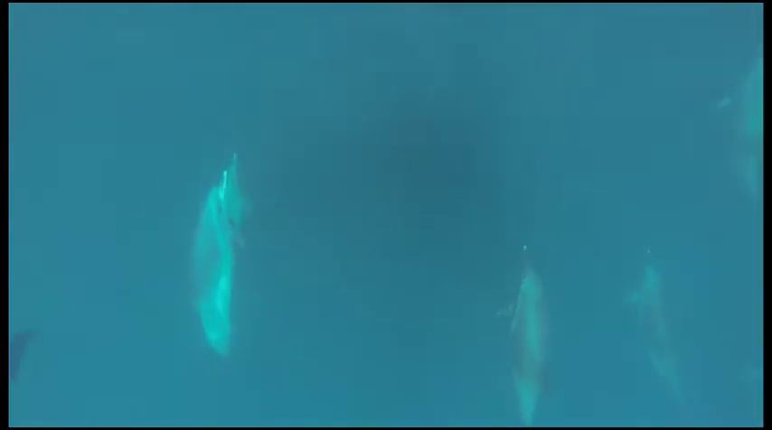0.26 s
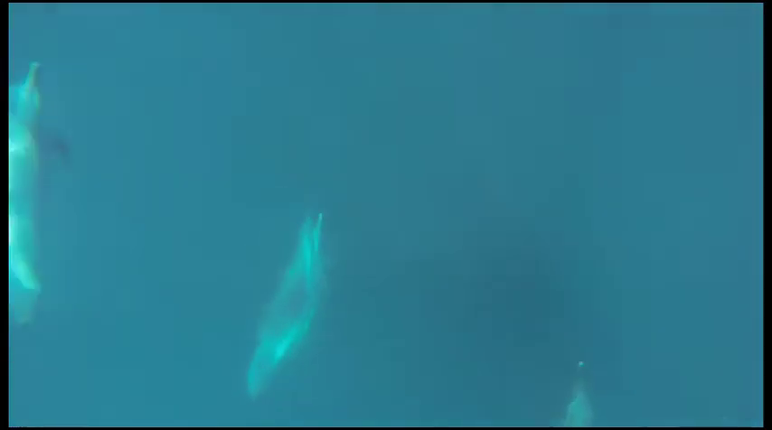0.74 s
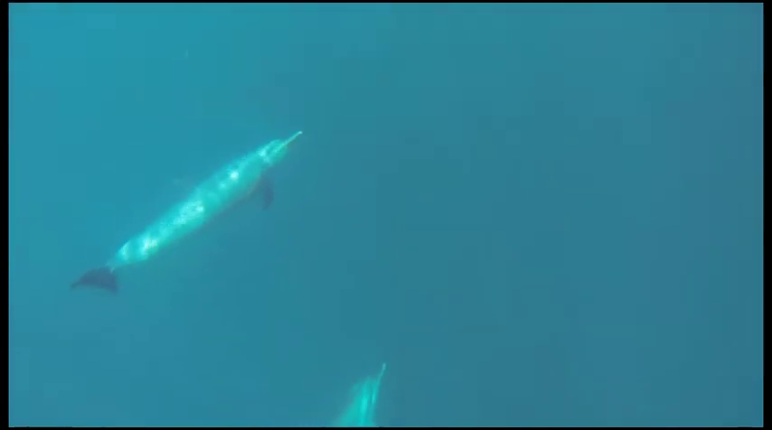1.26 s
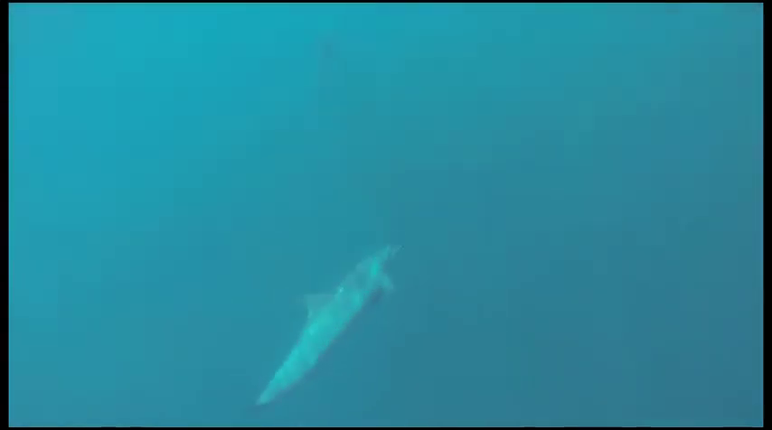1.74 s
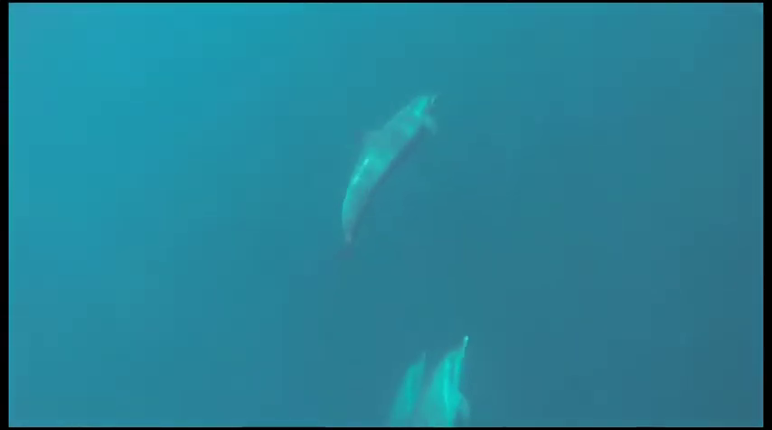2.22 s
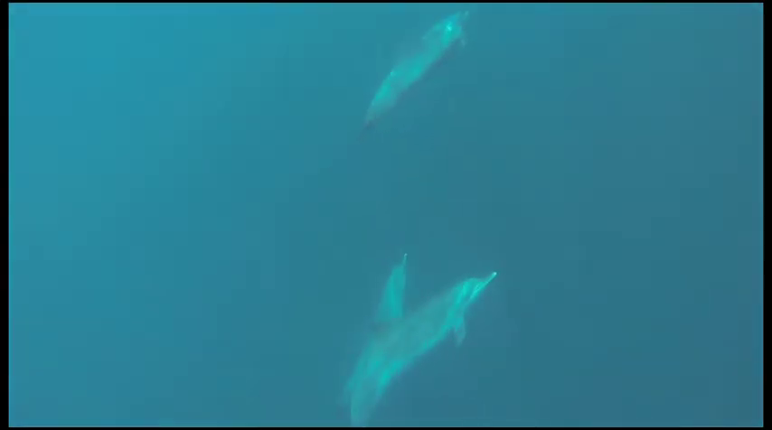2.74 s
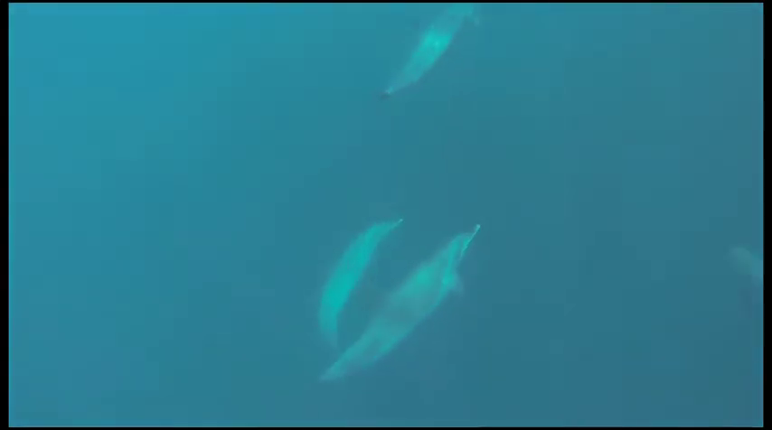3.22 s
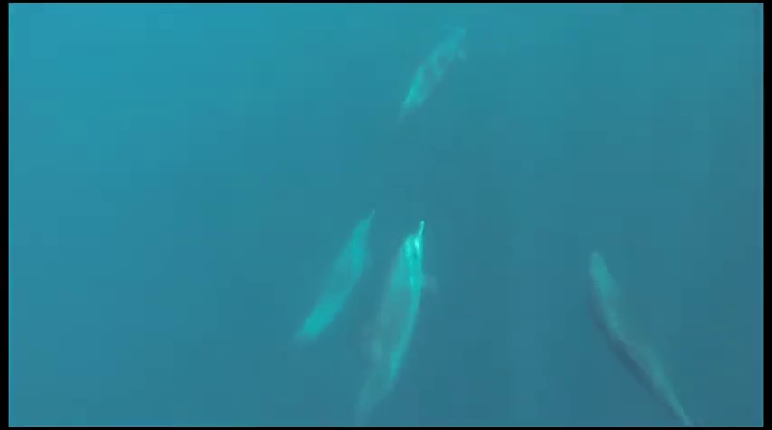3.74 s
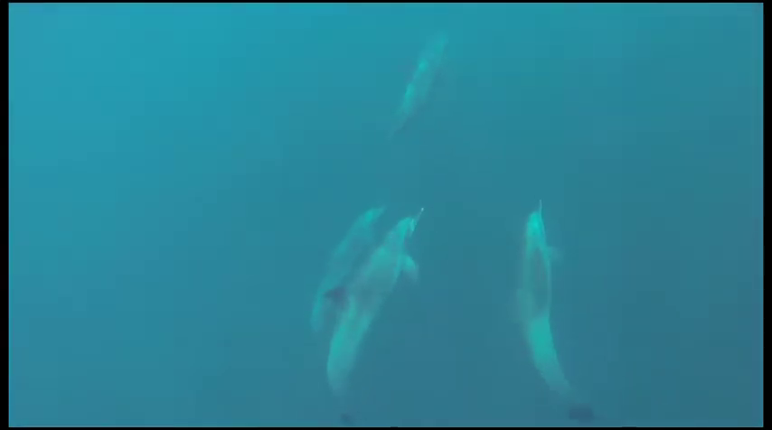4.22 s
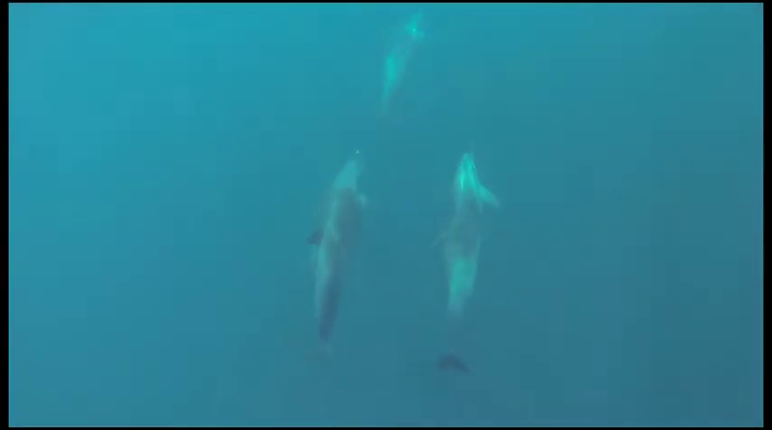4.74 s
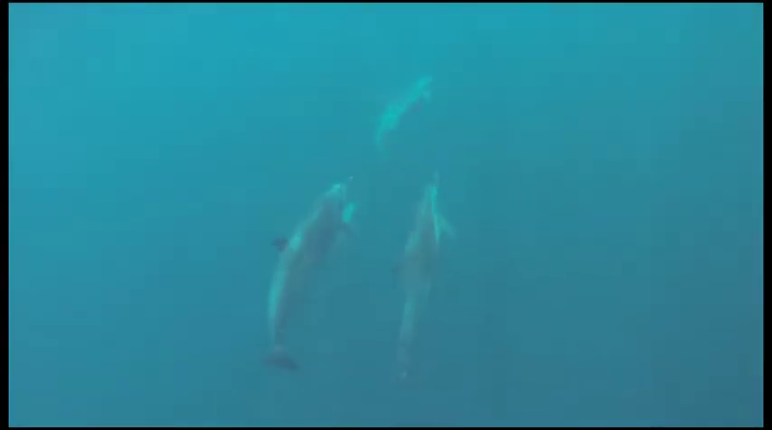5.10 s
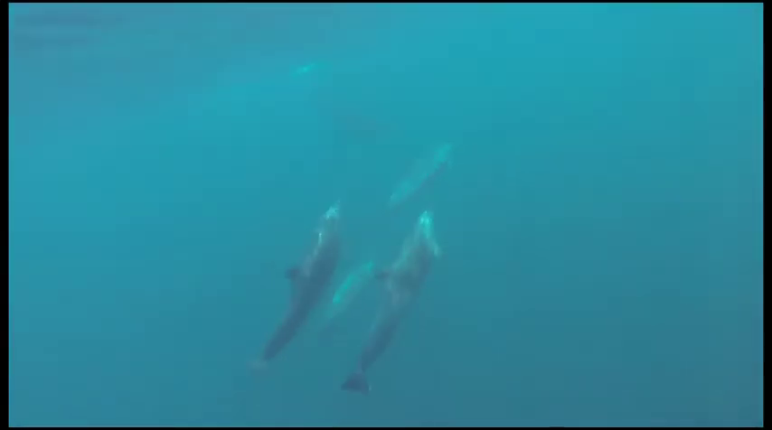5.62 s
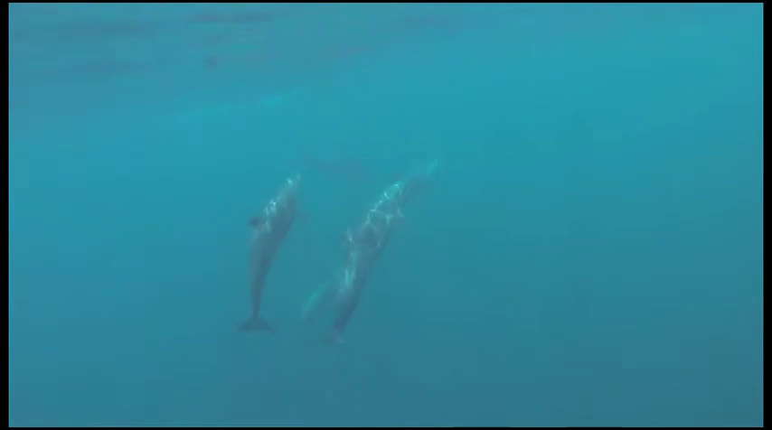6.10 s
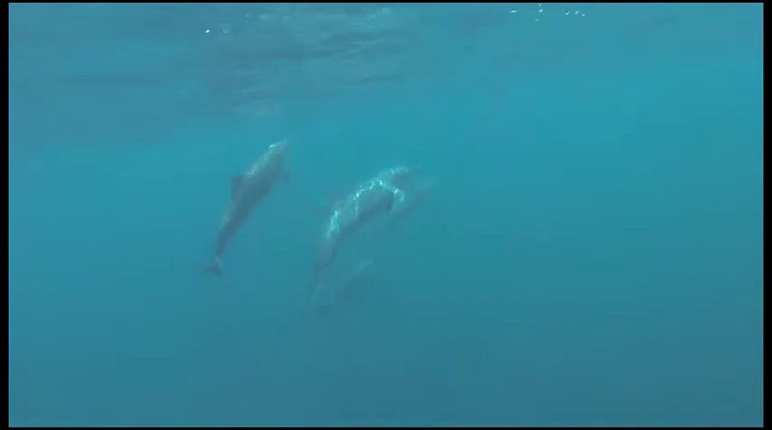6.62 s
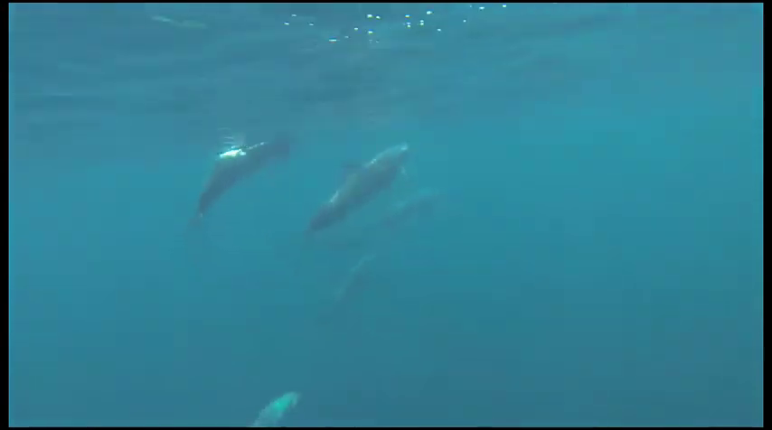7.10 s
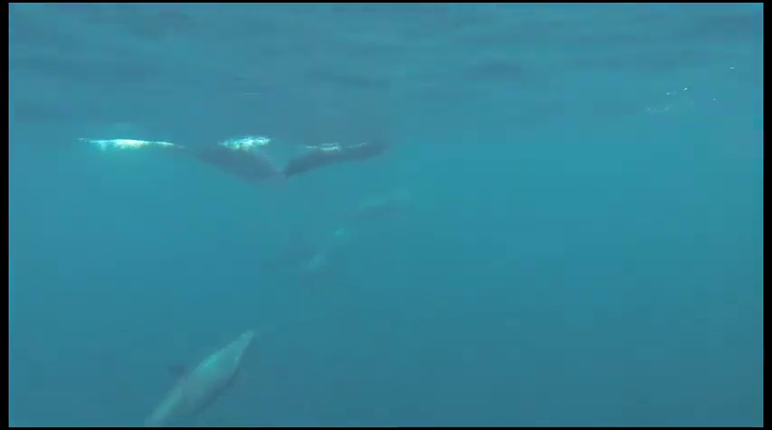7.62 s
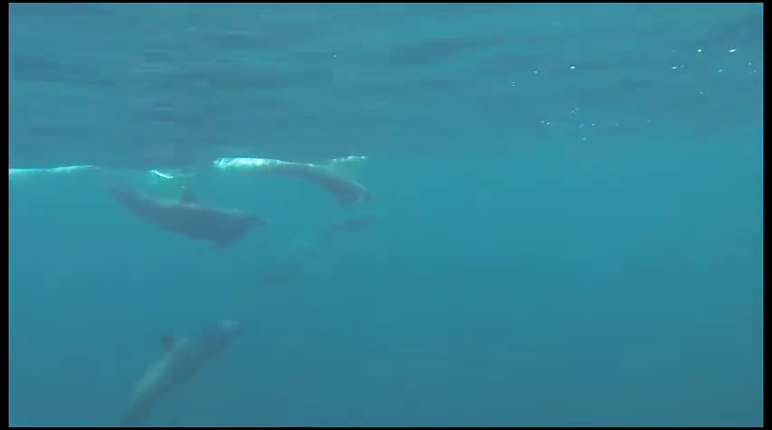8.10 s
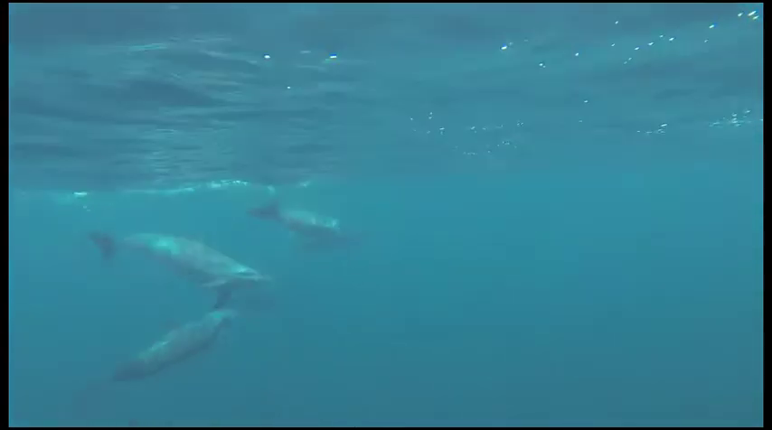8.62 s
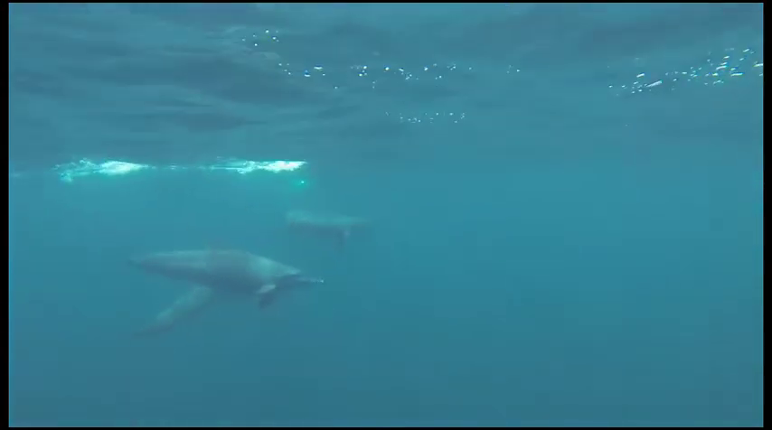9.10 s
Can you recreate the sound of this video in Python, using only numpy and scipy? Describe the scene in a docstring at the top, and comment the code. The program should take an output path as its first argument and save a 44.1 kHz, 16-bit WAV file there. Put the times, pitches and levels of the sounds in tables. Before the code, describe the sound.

Underwater, dolphins whistle in thin, fast upward sweeps and stair steps over a throbbing, crackling hiss, with clicks, bubble pings and small surface splashes.

```python
"""Dolphins passing under water

Dolphin whistles (sine tones) sweep upward, some in sudden steps; sonar clicks pass in trains of filtered impulses,
with dull knocks and noise-burst snaps. Behind throbs a crackling hiss, likely a boat's cavitating propellers:
sparse impulses and noise, modulated by three beats. Bubbles ping and gulp as decaying sines; surfacing backs splash.
Filtered noise slops against the camera housing, whose resonances colour the noise and clicks."""
import sys
import numpy as np
from scipy import signal
from scipy.fft import rfft, irfft
from scipy.io import wavfile
from scipy.ndimage import uniform_filter1d

SR = 44100
rng = np.random.default_rng(int(sys.argv[2]) if len(sys.argv) > 2 else 0)


def file_out(sig):
    """Save sig as 16-bit WAV at sys.argv[1]."""
    # one column per channel
    cols = np.atleast_2d(sig).T
    # limit, then scale
    lim = np.clip(cols, -1, 1)
    pcm = np.round(lim * 32767).astype(np.int16)
    wavfile.write(sys.argv[1], SR, pcm)


N = 412335
T = np.arange(N) / SR

# Table levels are relative: gains and filters follow.
# churn of the water, drives slosh and fizz, dulls the hiss: time_s, level_db
CHURN_CURVE = [(0.0, -57), (0.26, -58.5), (1.2, -49), (1.48, -53), (3.25, -54), (4.17, -63), (6.74, -67),
               (6.9, -57.5), (8.02, -61.5), (8.28, -52), (8.98, -63.5), (9.35, -54.5)]


def whistles(sweep_db=1.2, note_db=0):
    """Gliding and stepped whistles share a faint echo from the surface."""
    # unbroken whistles, one list each: time_s, pitch_hz, level_db
    sweep_points = [
        [(.128, 4100, -60), (.15, 4250, -53), (.192, 4700, -57), (.198, 4780, -43), (.235, 5250, -51),
         (.248, 5550, -42), (.285, 6450, -52)],
        [(1.935, 6050, -49), (2.0, 6400, -45), (2.06, 7800, -46), (2.075, 8400, -45), (2.155, 9050, -47),
         (2.165, 9450, -38), (2.25, 10500, -49), (2.42, 13900, -49), (2.45, 15200, -57)],
        [(2.98, 7150, -54), (3.1, 8700, -55), (3.13, 9900, -48), (3.21, 11200, -47), (3.325, 14700, -57)],
        [(3.19, 6450, -52), (3.272, 8780, -44), (3.277, 9000, -34), (3.33, 9280, -28), (3.349, 9390, -33),
         (3.351, 10380, -29), (3.378, 10620, -26), (3.412, 10650, -29), (3.45, 10600, -25), (3.499, 10590, -39),
         (3.502, 11980, -32), (3.577, 12120, -34), (3.58, 12830, -32), (3.607, 13160, -32), (3.625, 13520, -45),
         (3.65, 14050, -44), (3.665, 15000, -56)],
        [(3.555, 8750, -52), (3.66, 10150, -52), (3.75, 11900, -52), (3.91, 15200, -57)],
        [(3.9, 6250, -44), (3.94, 6550, -45), (4.0, 7400, -49), (4.06, 8750, -38), (4.1, 9350, -47),
         (4.21, 11300, -53), (4.34, 15200, -62)],
        [(4.91, 8850, -57), (5.04, 9400, -52), (5.18, 10250, -56), (5.26, 11000, -53), (5.4, 11800, -54),
         (5.58, 14900, -60)],
        [(6.39, 6700, -53), (6.5, 8400, -46), (6.56, 9150, -36), (6.62, 9950, -45), (6.67, 10800, -38),
         (6.73, 11650, -51), (6.76, 12450, -40), (6.805, 14750, -51), (6.84, 15400, -49)],
        [(8.68, 6550, -54), (8.72, 7300, -44), (8.76, 7750, -38), (8.84, 8550, -45), (8.88, 8980, -34),
         (8.92, 9400, -35), (8.96, 9930, -42), (8.995, 10450, -37), (9.04, 11350, -49), (9.08, 12750, -45),
         (9.165, 15400, -57)],
        [(8.765, 7450, -44), (8.82, 8190, -43), (8.855, 8750, -46), (8.905, 9730, -38), (8.96, 10330, -44),
         (9.0, 10760, -39), (9.03, 11250, -47)],
    ]
    # separate rising notes: start_s, length_s, pitch_hz, climb_hz, level_db
    stair_notes = [(.305, .027, 7170, 0, -42), (.37, .055, 8800, 250, -44), (.425, .051, 10110, 0, -44),
                   (.476, .098, 10660, 230, -43), (.574, .06, 12700, 440, -47),
                   (.634, .106, 13760, 400, -53), (7.767, .021, 4650, 750, -43),
                   (7.795, .075, 5550, 1050, -44), (7.87, .067, 6900, 950, -46),
                   (7.937, .1, 8250, 1000, -40), (8.038, .088, 9750, 1300, -42),
                   (8.126, .064, 11650, 800, -40), (8.19, .035, 13150, 800, -33),
                   (8.225, .027, 14200, 1050, -43)]
    out = np.zeros(N)
    for points in sweep_points:
        s, sound = sweep(points)
        add(out, s, amp(sweep_db) * sound)
    for s, *row in stair_notes:
        add(out, s, amp(note_db) * note(*row))
    return scatter(out, wet_db=-15, t60_s=0.043)


def sweep(points):
    """One whistle climbs without a break: (start_s, sound)."""
    s, hz, db = np.transpose(points)
    t = np.arange(s[0], s[-1], 1 / SR)
    return s[0], tone(np.interp(t, s, hz), np.interp(t, s, db), edge_s=0.0076)


def note(length_s, pitch_hz, climb_hz, db, scoop_hz=200, scoop_s=0.0102, fade_db=9, edge_s=0.00089):
    """One stair of a stepped whistle: scoops up to pitch, creeps higher and weakens before its end."""
    t = np.arange(0, length_s + edge_s, 1 / SR)
    hz = pitch_hz + climb_hz * t / length_s - scoop_hz * np.exp(-t / scoop_s)
    return tone(hz, db - fade_db * (t / length_s) ** 5, edge_s)


def tone(hz, db, edge_s, waver_hz=15, waver_s=.006, steady_db=-30, flutter_per_db=.24):
    """Sine with an octave overtone at low pitch; the fainter it arrives, the more it wavers and breaks up."""
    # octave overtone relative to the fundamental: pitch_hz, level_db
    overtone_curve = [(4200, 10), (4700, -2), (6300, -7), (7500, -15), (8000, -70)]
    t = np.arange(len(hz)) / SR
    ends = np.clip(np.minimum(t, t[-1] - t) / edge_s, 0, 1)
    chances = rng.standard_normal((2, 200))
    waver, fading = (np.interp(t, np.arange(len(c)) * waver_s, c) for c in chances)
    flutter_db = flutter_per_db * np.maximum(steady_db - db, 0)
    # waver_hz applies at steady_db and above
    wavering_hz = hz + waver_hz * (1 + flutter_db) * waver
    phase = 2 * np.pi * np.cumsum(wavering_hz) / SR
    overtone = amp(np.interp(hz, *np.transpose(overtone_curve))) * np.sin(2 * phase)
    level = np.sqrt(2) * amp(db + flutter_db * fading)
    return level * ends * (np.sin(phase) + overtone)


def clicks(snap_db=10.0, sonar_db=0.0, snap_s=0.00065, far_db=-24, far_spread_db=9, count=70):
    """Snaps are brief noise bursts, a few near and many far; sonar clicks are single, brighter impulses."""
    # near snaps: start_s, level_db
    near = [(0.7017, -19), (.826, -20.5), (1.9193, -20.5), (2.8503, -22), (2.951, -20), (2.978, -22),
            (3.0304, -23), (4.63, -24), (4.8404, -23), (5.161, -22), (5.3485, -25), (5.814, -23),
            (6.168, -23), (6.209, -26), (6.323, -20.5), (6.783, -22), (6.9945, -24), (7.2674, -23),
            (7.899, -24)]
    # echolocation trains: first_s, last_s, fastest_s, shortest_gap_s, level_db
    trains = [(.025, .6, .21, 0.025, -29), (8.127, 8.57, 8.33, .0268, -19)]
    # spectra ahead of the housing: freq_hz, level_db
    snap_spectrum = [(300, -22), (1500, -11), (4000, 6.5), (7000, -1.5), (11000, -7.5), (15500, -28)]
    sonar_spectrum = [(500, -26), (2000, 7), (7000, -12), (11000, -1), (14500, 5), (16000, -19)]
    snaps, sonar = np.zeros(N), np.zeros(N)
    t = np.arange(SR // 100) / SR
    far = [(when * N / SR, far_db - far_spread_db * distance) for when, distance in rng.random((count, 2))]
    for s, db in near + far:
        burst = rng.standard_normal(len(t)) * np.exp(-t / snap_s)
        add(snaps, s, amp(db + snap_db) * burst / np.linalg.norm(burst))
    for train in trains:
        for s, db in sonar_train(*train):
            add(sonar, s, amp([db + sonar_db]))
    dry_clicks = colour(snaps, snap_spectrum) + colour(sonar, sonar_spectrum)
    return scatter(dry_clicks, wet_db=-6, t60_s=0.057)


def sonar_train(first_s, last_s, fastest_s, gap_s, db, slowing=.15, fall_db=9, fall_s=0.3, uneven_db=3.0):
    """Clicks quicken and grow as a dolphin's beam swings past, then slow and fade: rows of time_s, level_db."""
    rows, s = [], first_s
    for chance in rng.standard_normal(60):
        if s <= last_s:
            fall = min(((s - fastest_s) / fall_s) ** 2, 1)
            rows.append((s, db - fall_db * fall + uneven_db * chance))
            s += gap_s + slowing * (s - fastest_s) ** 2
    return rows


def knocks(level_db=-28.5, pitch_hz=4050, t60_s=.0035, uneven_db=1.5, pitch_spread=.06):
    """Departing dolphin, outside its sonar beam: only the low, briefly ringing part of each click is left."""
    # first_s, last_s, gap_s
    knock_times = (8.6505, 9.31, .034)
    out, times = np.zeros(N), np.arange(*knock_times)
    for s, (strength, detune) in zip(times, rng.standard_normal((len(times), 2))):
        knock = bubble(pitch_hz * (1 + pitch_spread * detune), t60_s, rise=0, onset=0.078)
        add(out, s, amp(level_db + uneven_db * strength) * knock)
    return scatter(out, wet_db=-9, t60_s=0.033)


def propellers(level_db=4.0, cavities_per_s=3500, cavity_spread_db=3.5, smooth_db=-3, uneven_db=3.0,
               patchy_db=2.0, most_db=8, burst_hz=2300, treble_hz=7500):
    """Collapsing cavities crackle in bursts at every beat of the blades."""
    # blade beats: first_crest_s, beat_hz
    beats = [(.0166, 39.18), (.0099, 17.255), (.003, 25.97)]
    # one depth_db per beat, before the tanh limit
    beat_depths_db = [3, 2, 1.33]
    # hiss level: time_s, level_db
    thrust_curve = [(0.0, -45.5), (2.68, -45), (3.07, -43), (3.93, -49.5), (5.26, -46.5), (5.86, -46),
                    (6.33, -45), (7.52, -47.5), (8.49, -47), (8.8, -51), (9.35, -45.5)]
    # spectrum ahead of the housing: freq_hz, level_db
    hiss_spectrum = [(100, -38.5), (400, -13), (750, -17.5), (1200, -7), (1900, 2), (2800, -3.5),
                     (3700, 4.5), (5000, -0.5), (6500, -9.5), (7300, -5), (10000, -7.5), (11700, -14.5),
                     (14500, -22.5), (15500, -27)]
    throb_db = uneven_db * drift(200)
    for (s, hz), depth_db in zip(beats, beat_depths_db):
        throb_db = throb_db + depth_db * np.cos(2 * np.pi * hz * (T - s))
    throb_db = most_db * np.tanh(throb_db / most_db)
    smooth = amp(smooth_db) * rng.standard_normal(N)
    cavities = evened(crackle(cavities_per_s, cavity_spread_db) + smooth)
    steady_hiss = colour(cavities * amp(follow(thrust_curve)), hiss_spectrum)
    hz, t, z = signal.stft(steady_hiss, SR, nperseg=128)
    hz = hz[:, None] + 1
    # bursts stand out in the upper hiss; its low part stays steadier
    z = z * amp(np.interp(t, T, throb_db) / (1 + (burst_hz / hz) ** 2))
    z = z * amp(np.interp(t, T, treble_db())) ** (1 / (1 + (treble_hz / hz) ** 6))
    # random colour patches: a few ms long, a kHz or two wide
    patches = uniform_filter1d(rng.standard_normal(z.shape), size=7, axis=0)
    patches = uniform_filter1d(patches, size=4, axis=1)
    hiss = signal.istft(z * amp(patchy_db * evened(patches)), SR)[1][:N]
    return amp(level_db) * surface_echo(hiss)


def treble_db(absorb=0.21, usual_db=0.9, turn_db=1.6, turn_s=5.7, turning_s=0.58):
    """Churned water soaks up the top of the hiss, which brightens when the camera turns up to the surface."""
    return usual_db - absorb * churn_db() + turn_db * np.tanh((T - turn_s) / turning_s)


def surface_echo(x, delay_s=.0033, sway_s=0.00019, strength=0.26):
    """The moving surface mirrors the sound with inverted sign, combing its spectrum."""
    return x - strength * np.interp(T - delay_s - sway_s * drift(0.3), T, x, left=0)


def near_bubbles(ping_db=-1, gulp_db=0, cycles=55, gulp_cycles=27):
    """Single bubbles ping close under the echoing surface; larger air pockets gulp with a rising pitch."""
    # near bubbles: start_s, level_db, pitch_hz
    ping_rows = [(1.329, -16.5, 3400), (1.758, -25, 3330), (1.791, -22, 3110), (1.948, -26, 1920),
                 (2.347, -28.5, 1930), (2.625, -40, 930), (2.668, -36, 1510), (2.827, -27, 3230),
                 (3.65, -36.5, 1400), (7.06, -28, 3420), (7.075, -18.5, 3250), (7.104, -30, 1820),
                 (7.131, -27, 2400), (7.1307, -28, 3240), (7.252, -23.5, 2230), (7.441, -35.5, 1530),
                 (7.8678, -27, 2450), (8.154, -26, 1990), (8.236, -20, 3390), (8.372, -26, 2300),
                 (9.2174, -28, 3080)]
    # gulps at the housing: start_s, level_db, pitch_hz
    gulp_rows = [(0.031, -38, 415), (.435, -32, 540), (0.451, -36, 630), (1.002, -30, 540),
                 (1.246, -36.5, 480), (1.767, -44, 840), (1.865, -44, 850), (2.08, -36, 865),
                 (2.083, -34, 540), (4.468, -44, 490), (4.691, -48, 425), (4.859, -43.5, 480),
                 (5.457, -44, 550), (6.324, -41.5, 525), (6.71, -49, 400), (6.765, -44, 520),
                 (6.83, -50, 360), (6.942, -43, 510), (7.15, -45, 638), (7.314, -43, 562),
                 (7.97, -41.5, 530), (8.904, -31, 535)]
    pings, gulps = np.zeros(N), np.zeros(N)
    for s, db, hz in ping_rows:
        add(pings, s, amp(db + ping_db) * bubble(hz, cycles / hz, rise=0.022, onset=0.019))
    for s, db, hz in gulp_rows:
        add(gulps, s, amp(db + gulp_db) * bubble(hz, gulp_cycles / hz, rise=0.09, onset=0.12))
    return scatter(pings, wet_db=-10.5, t60_s=0.072) + gulps


def splashes(bubbles_per_s=70, ping_db=-34, low_hz=1800, high_hz=3600, spread_db=10, t60_s=0.018,
             gurgles_per_s=100, gurgle_db=-7.5, gurgle_hz=300):
    """A back breaks the surface and drags down air, which breaks up into rising gurgles and pinging bubbles."""
    # surfacing dolphins: start_s, length_s, wash_db
    splash_rows = [(6.71, .19, -47), (7.054, 0.094, -50), (7.243, .1, -51), (7.34, .7, -59),
                   (8.12, .23, -40.5), (8.308, .14, -43.5)]
    # wash spectrum ahead of the housing: freq_hz, level_db
    wash_spectrum = [(90, -26), (200, -6.5), (400, -4), (600, -19), (1000, -4.5), (2200, 6), (5000, -0.5),
                     (14000, -28)]
    swell, pings = np.zeros(N), np.zeros(N)
    for s, length_s, wash_db in splash_rows:
        add(swell, s, amp(wash_db) * signal.windows.tukey(int(length_s * SR), .5))
        for when, size, distance in rng.random((int(length_s * bubbles_per_s), 3)):
            ping = bubble(low_hz * (high_hz / low_hz) ** size, t60_s, rise=0.016, onset=0.067)
            add(pings, s + when * length_s, amp(ping_db - spread_db * distance) * ping)
        for when, size, distance in rng.random((int(length_s * gurgles_per_s), 3)):
            gurgle = bubble(gurgle_hz * 2 ** size, t60_s=0.06, rise=0.16, onset=0.092)
            add(pings, s + when * length_s, amp(wash_db + gurgle_db - spread_db * distance) * gurgle)
    return pings + colour(swell * crackle(per_s=1300, spread_db=3), wash_spectrum)


def bump():
    """Something nudges the housing, which rings for a few cycles."""
    # start_s, level_db, pitch_hz, t60_s
    bump_row = (7.274, -34, 644, 0.012)
    out, (s, db, hz, t60_s) = np.zeros(N), bump_row
    add(out, s, amp(db) * bubble(hz, t60_s, rise=0, onset=0.12))
    return out


def fizz(level_db=-50, stir=0.65, spread_db=2.0, cycles=36, count=4000):
    """Many small bubbles ring under the surface, each size at its own pitch."""
    # bubble strength by pitch: pitch_hz, level_db
    fizz_curve = [(800, -13.5), (1250, -13), (1850, 0.5), (2400, -1), (2850, 3), (3250, 9), (4200, -20),
                  (6500, -12)]
    out = np.zeros(N)
    pitches_hz, strengths_db = np.transpose(fizz_curve)
    for when, size, chance in rng.random((count, 3)):
        hz = pitches_hz[0] * (pitches_hz[-1] / pitches_hz[0]) ** size
        db = np.interp(hz, pitches_hz, strengths_db) + spread_db * min(-np.log(chance), 4)
        add(out, when * N / SR, amp(db) * bubble(hz, cycles / hz, rise=0.014, onset=0.075))
    return amp(level_db + stir * churn_db()) * evened(out)


def slosh(level_db=1.3, lumpy_db=3.0, rumble_db=-76):
    """Water laps unevenly on the housing over a faint rumble: filtered noise."""
    # spectra ahead of the housing: freq_hz, level_db
    lap_spectrum = [(100, -29), (280, -10), (420, -2), (600, 2), (750, -5.5), (1100, -8.5), (2500, -29)]
    rumble_spectrum = [(20, -17), (50, -7), (88, 1.5), (115, -2.5), (200, -8), (2000, -46)]
    laps = evened(rng.standard_normal(N) * amp(lumpy_db * drift(24.0)))
    lapping = colour(laps * amp(follow(CHURN_CURVE)), lap_spectrum)
    rumble = colour(rng.standard_normal(N), rumble_spectrum)
    return amp(level_db) * lapping + amp(rumble_db) * rumble


def churn_db(usual_db=-58.5):
    """How far the water is churned above its usual state."""
    return follow(CHURN_CURVE) - usual_db


def bubble(hz, t60_s, rise, onset):
    """A bubble swells into ringing and dies away, its pitch creeping up by 2 * rise over t60_s."""
    t = np.arange(0, t60_s, 1 / SR)
    ring = amp(-60 * t / t60_s) * (1 - np.exp(-t / (onset * t60_s)))
    return ring / ring.max() * np.sin(2 * np.pi * hz * t * (1 + rise * t / t60_s))


def crackle(per_s, spread_db):
    """Sparse impulses of random sign and size, rms 1."""
    size = amp(spread_db * np.minimum(rng.exponential(1, N), 4)) * rng.choice([-1, 1], N)
    return evened(size * (rng.random(N) < per_s / SR))


def scatter(x, wet_db, t60_s):
    """The rippled surface sends back a short spray of echoes."""
    t = np.arange(0, t60_s, 1 / SR)
    sparse = rng.random(len(t)) < .05
    taps = rng.standard_normal(len(t)) * sparse * amp(-60 * t / t60_s)
    return x + amp(wet_db) * signal.oaconvolve(x, taps / np.linalg.norm(taps))[:N]


def colour(x, spectrum, size=4096):
    """Minimum-phase filter of unit energy: a source spectrum lifted by the housing resonances."""
    # housing resonances: centre_hz, width_hz, lift_db
    housing = [(555.5, 193, 10.5), (925, 196, 5.5), (1830, 520, 3), (2440, 480, 7.5), (3176, 475, 10),
               (4207, 410, 4), (5478, 610, 8), (6295, 780, 9), (8980, 1360, 4), (10880, 790, 10.5),
               (12620, 580, 7), (13260, 800, 9)]
    hz = np.fft.rfftfreq(size, 1 / SR)
    f, db = np.transpose(spectrum)
    db = np.interp(np.log(hz + 1), np.log(f), db)
    db = db + sum(lift / (1 + (2 * (hz - centre) / width) ** 4) for centre, width, lift in housing)
    log_gain = np.log(amp(np.r_[db, db[-2:0:-1]]))
    # the Hilbert transform of log gain gives the minimum phase
    ring = np.fft.ifft(np.exp(signal.hilbert(log_gain).conj())).real[:size // 2]
    return signal.oaconvolve(x, ring / np.linalg.norm(ring))[:len(x)]


def drift(rate_hz):
    """Slow random motion of rms 1, rolling off around rate_hz."""
    rolloff = np.exp(-(np.fft.rfftfreq(N, 1 / SR) / rate_hz) ** 2)
    return evened(irfft(rfft(rng.standard_normal(N)) * rolloff, N))


def follow(curve):
    """A curve of (time_s, value) rows at every sample."""
    return np.interp(T, *np.transpose(curve))


def amp(db):
    """Decibels to gain."""
    return 10 ** (np.asarray(db) / 20)


def evened(x):
    """Scales to rms 1."""
    return x / np.sqrt(np.mean(x ** 2) + 1e-20)


def add(mix, s, sound):
    """Mixes a sound in at time s, in seconds."""
    part = mix[max(round(s * SR), 0):][:len(sound)]
    part += sound[:len(part)]


def scene():
    """All sources meet at one microphone."""
    dolphins = whistles() + clicks() + knocks()
    water = near_bubbles() + splashes() + bump() + fizz() + slosh()
    return (dolphins + propellers() + water)[None]


def record(dry):
    """The camera's band limit: a linear-phase low-pass."""
    edge_hz = 15500
    taps = signal.firwin(301, edge_hz, window=("kaiser", 9), fs=SR)
    return signal.oaconvolve(dry, taps[None], "same")


dry = scene()
out = record(dry)
file_out(out)
```